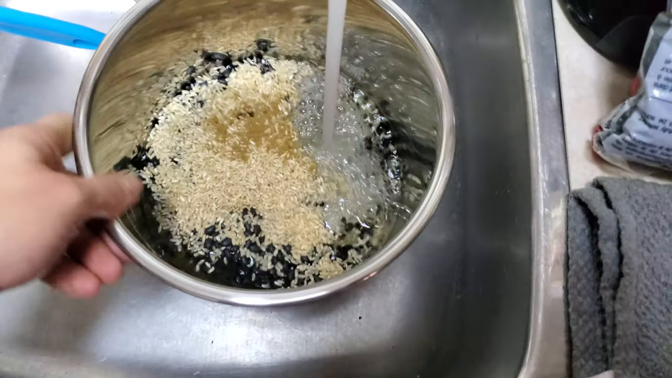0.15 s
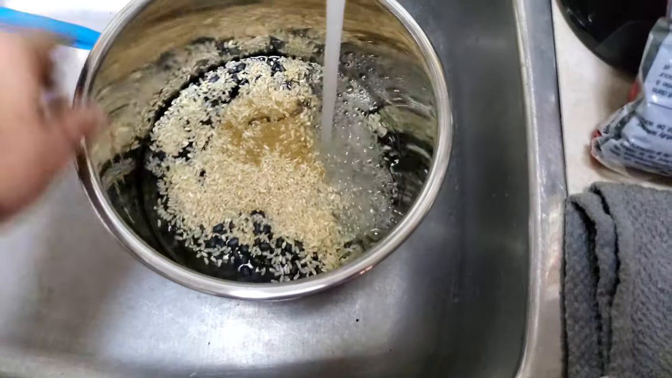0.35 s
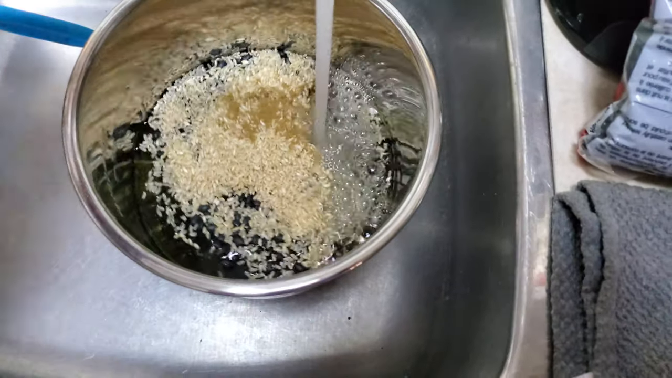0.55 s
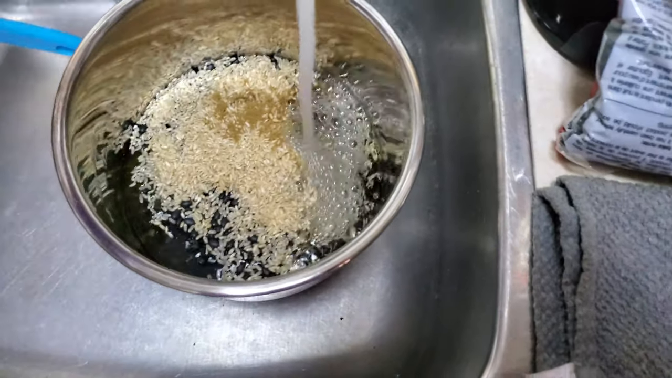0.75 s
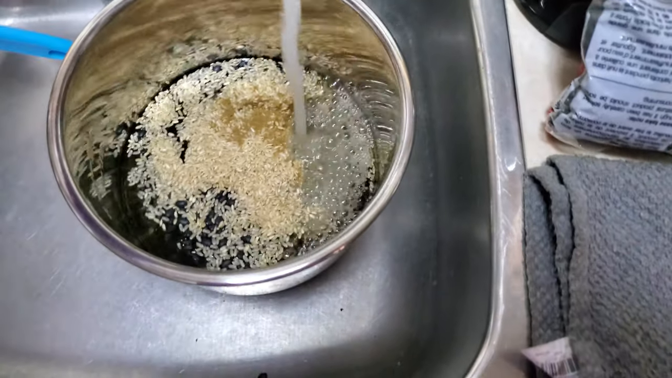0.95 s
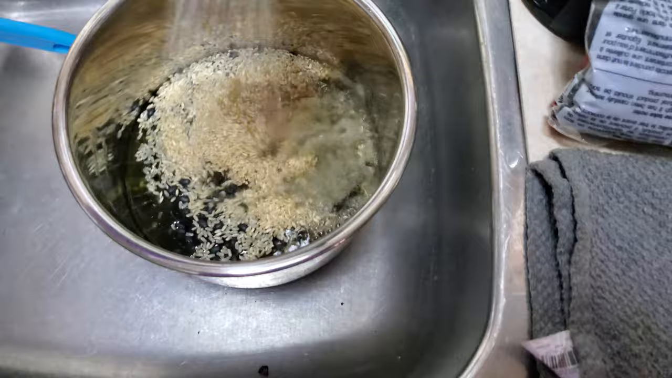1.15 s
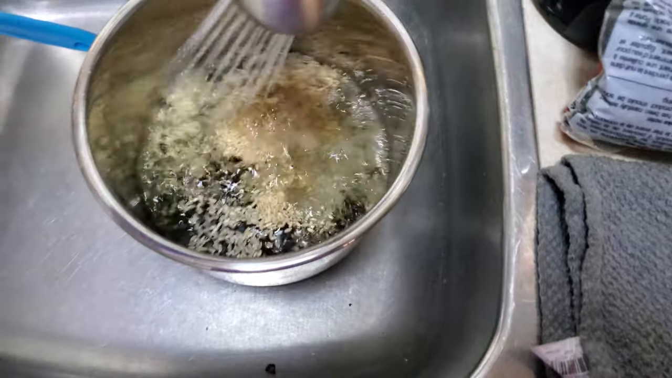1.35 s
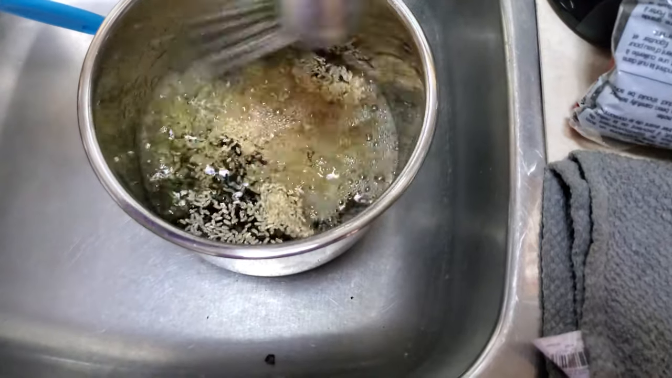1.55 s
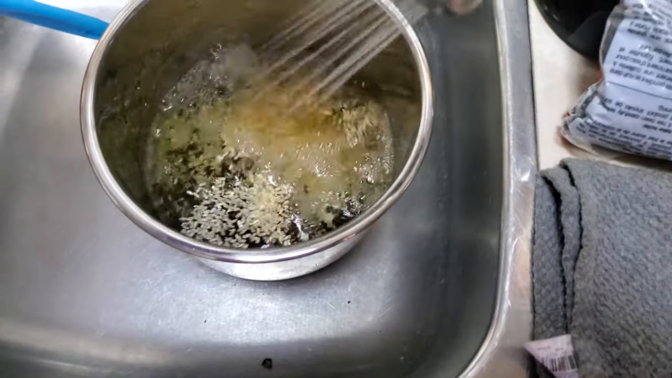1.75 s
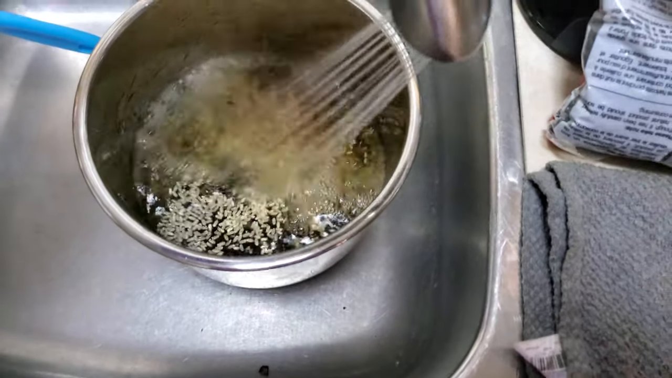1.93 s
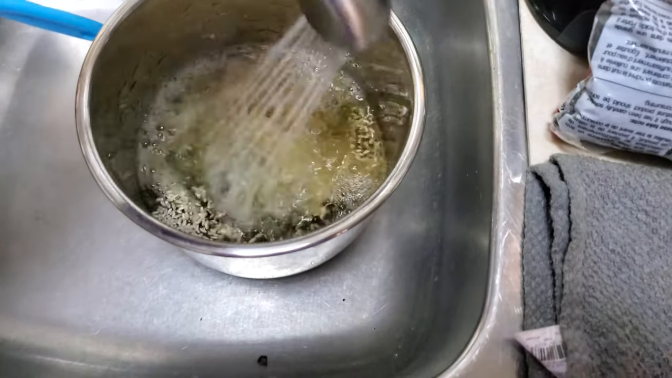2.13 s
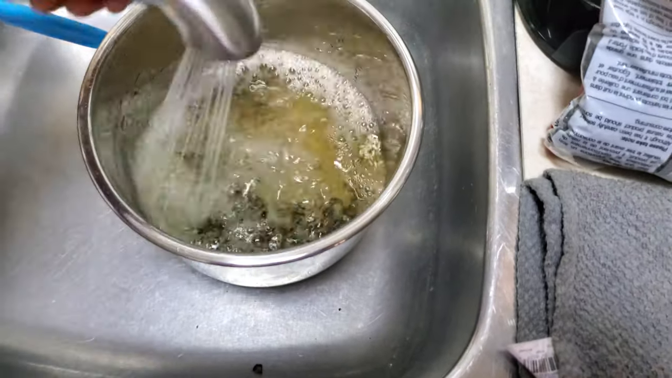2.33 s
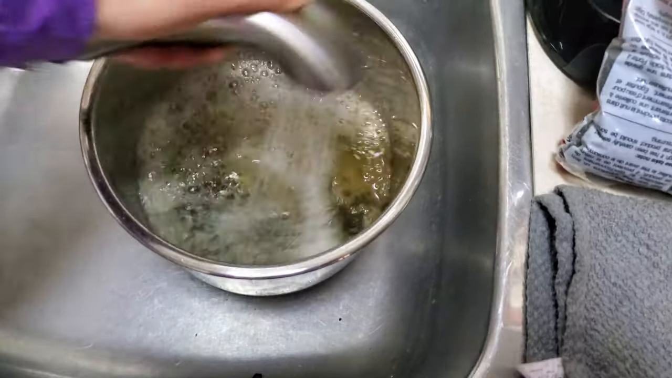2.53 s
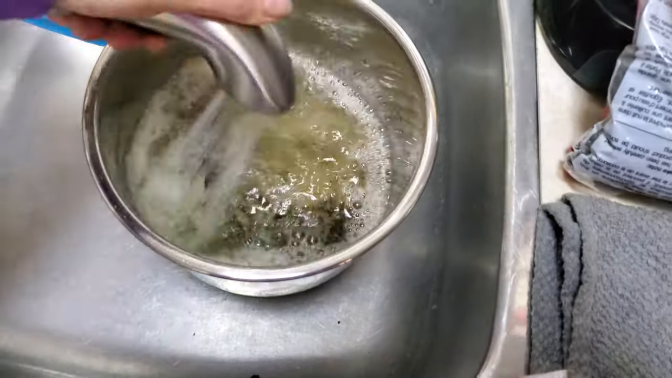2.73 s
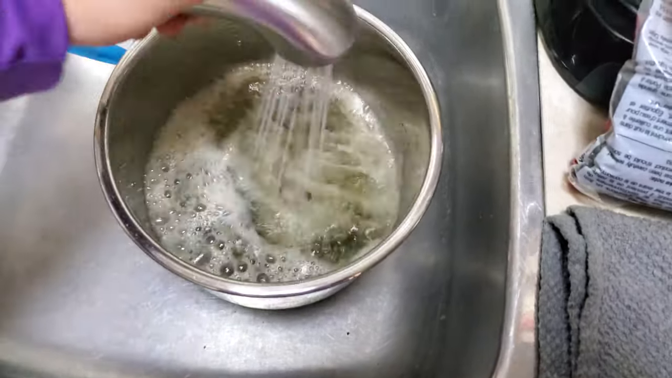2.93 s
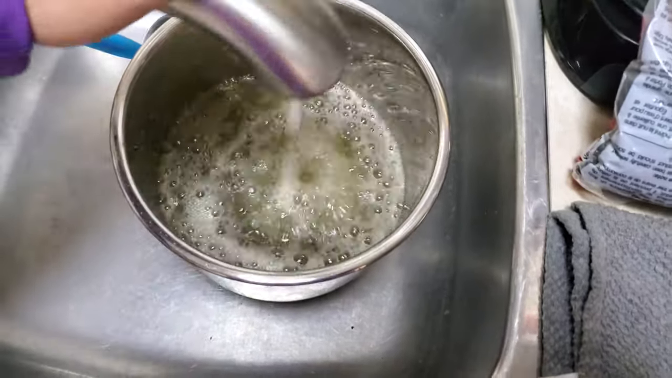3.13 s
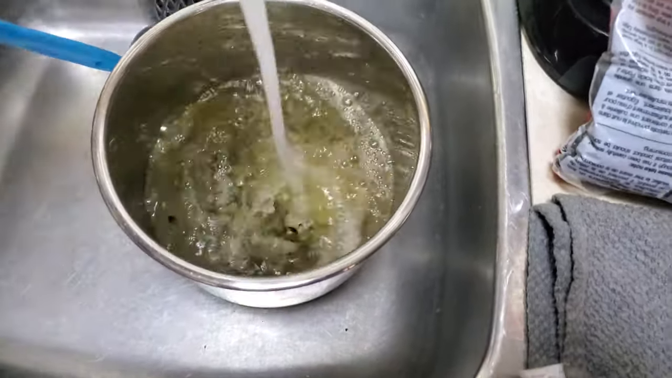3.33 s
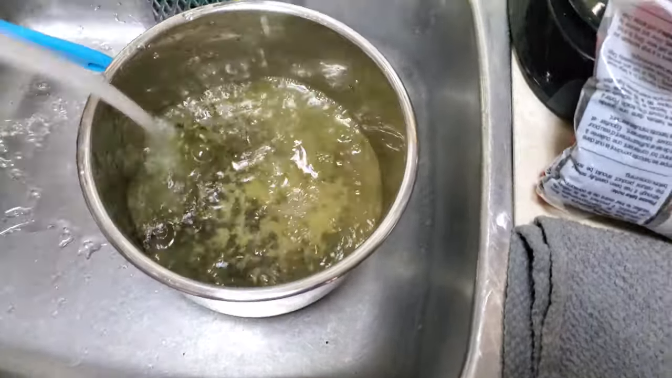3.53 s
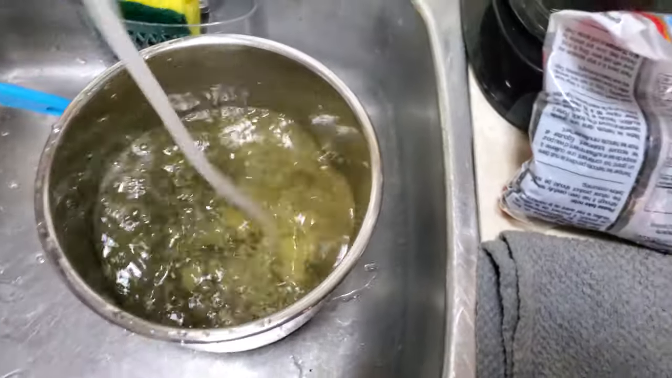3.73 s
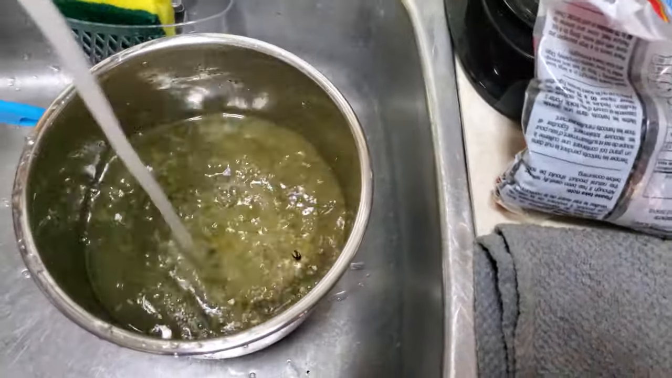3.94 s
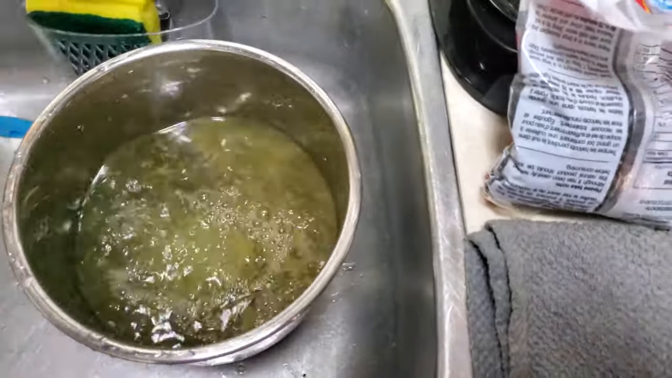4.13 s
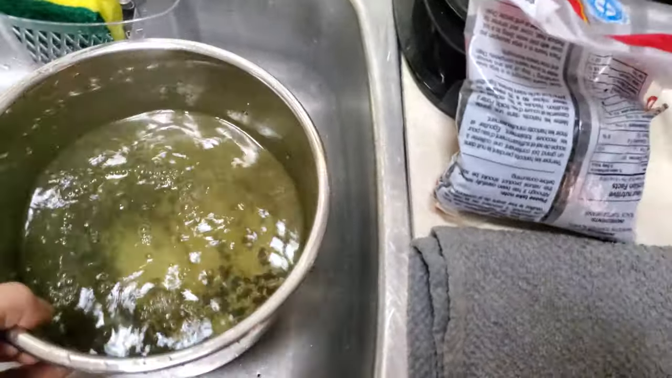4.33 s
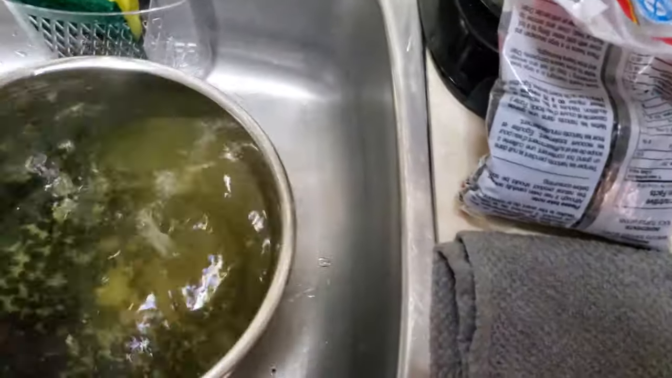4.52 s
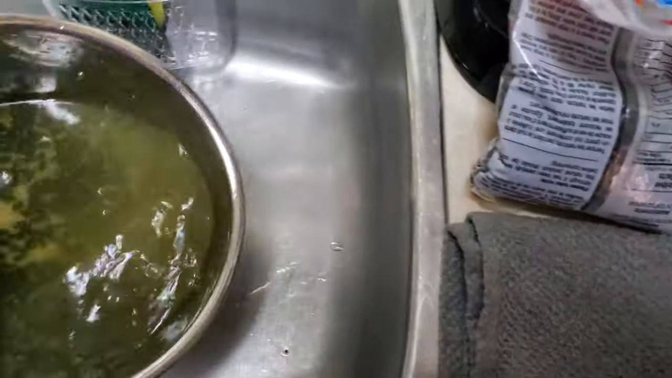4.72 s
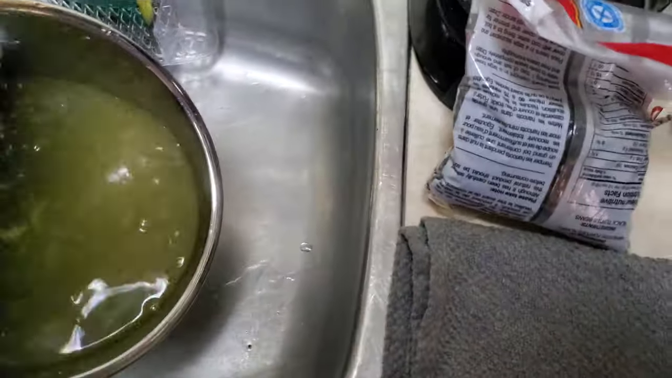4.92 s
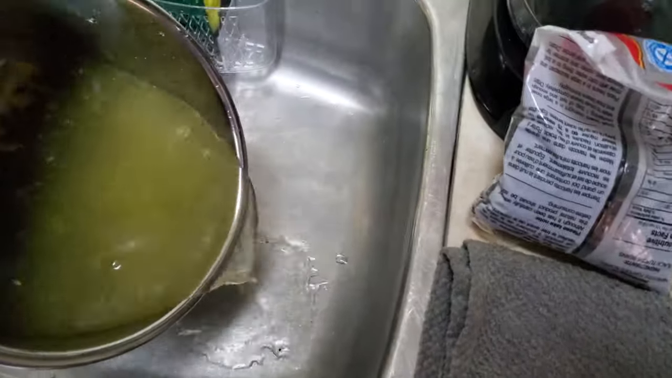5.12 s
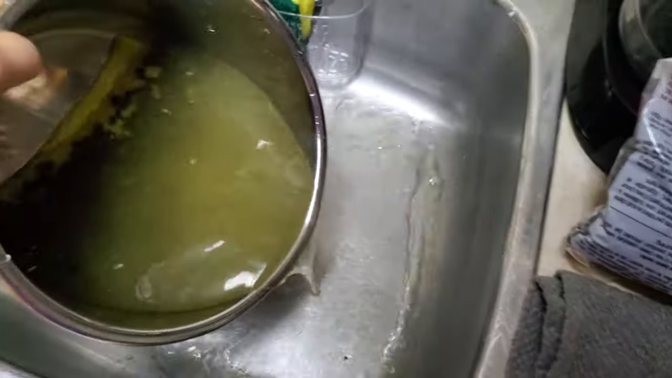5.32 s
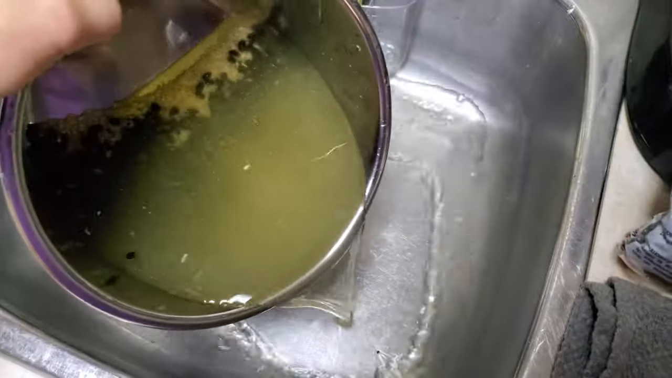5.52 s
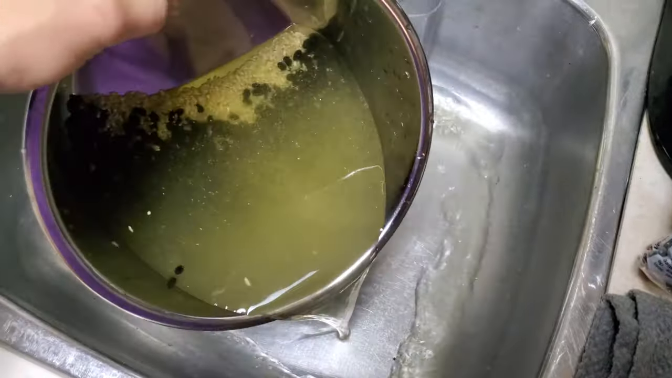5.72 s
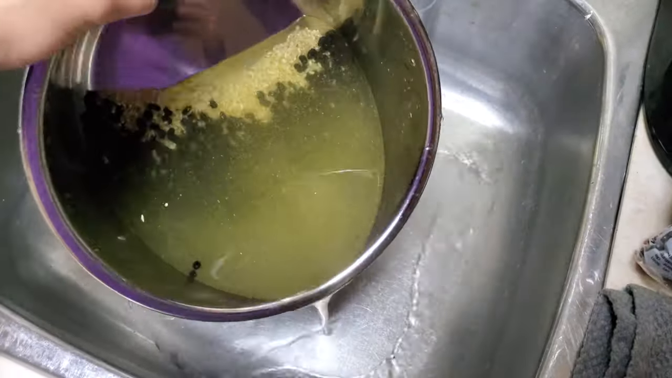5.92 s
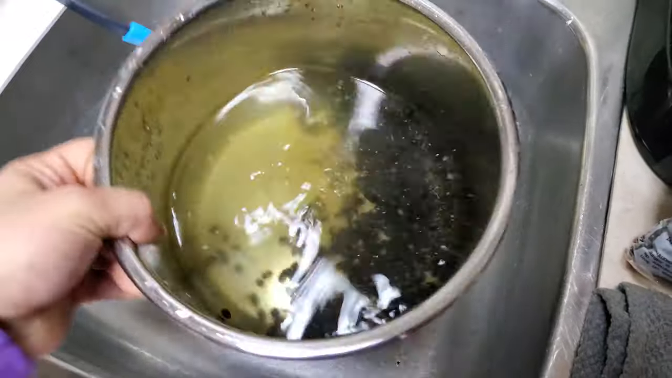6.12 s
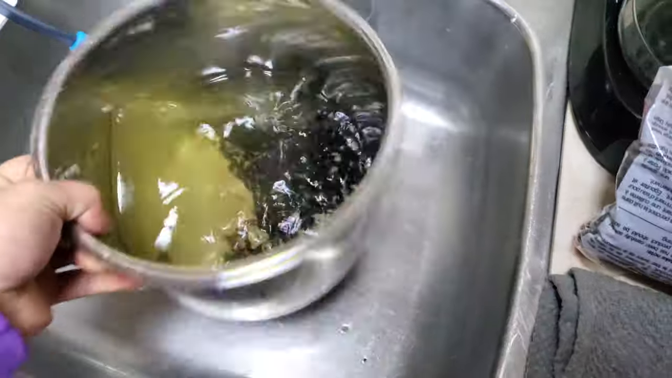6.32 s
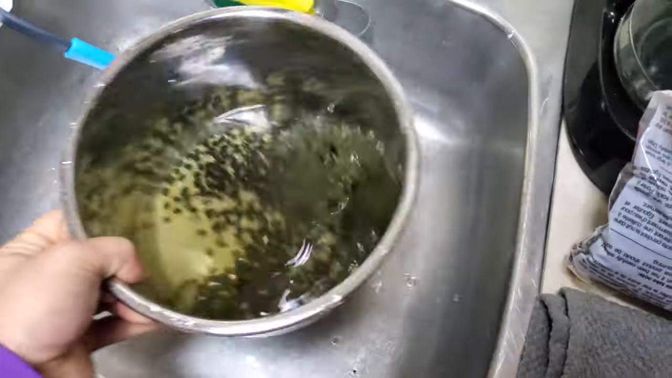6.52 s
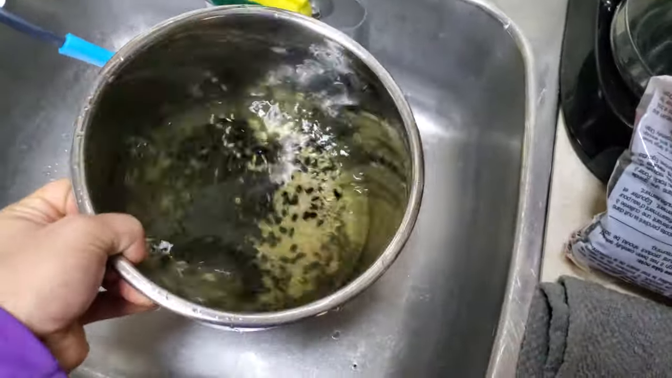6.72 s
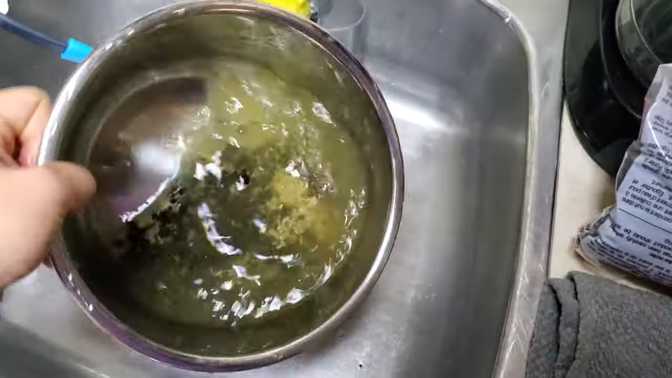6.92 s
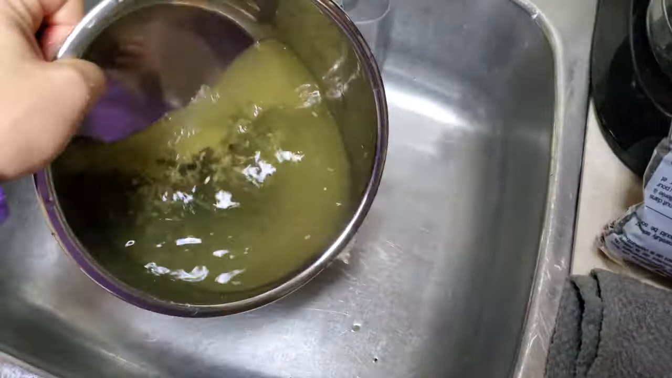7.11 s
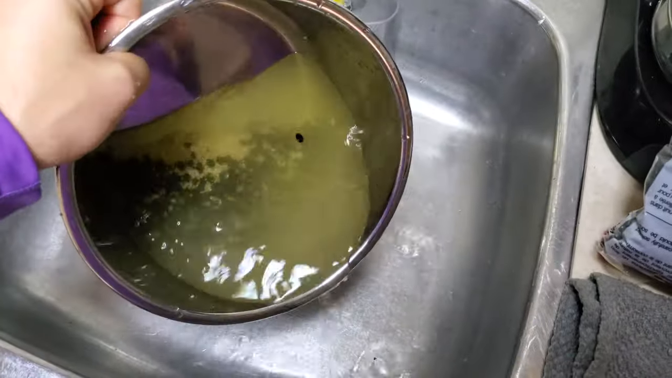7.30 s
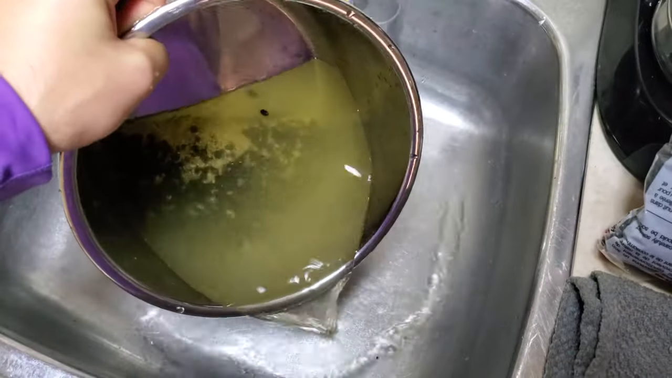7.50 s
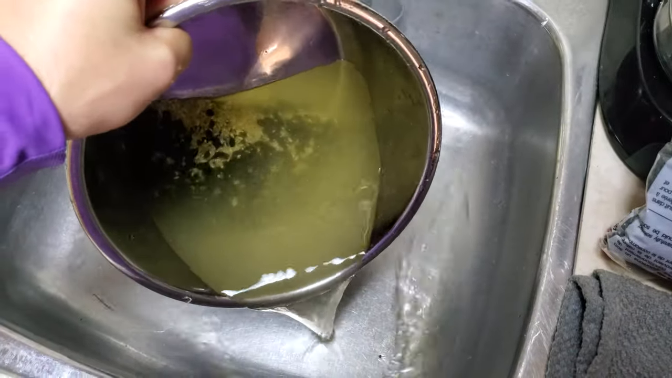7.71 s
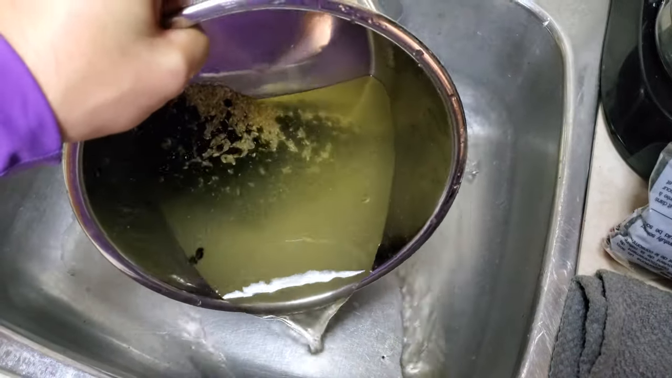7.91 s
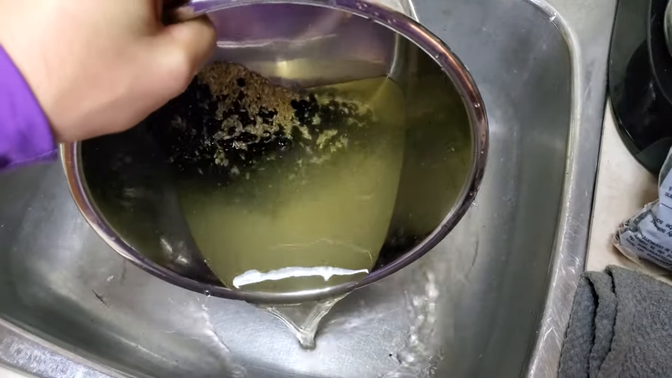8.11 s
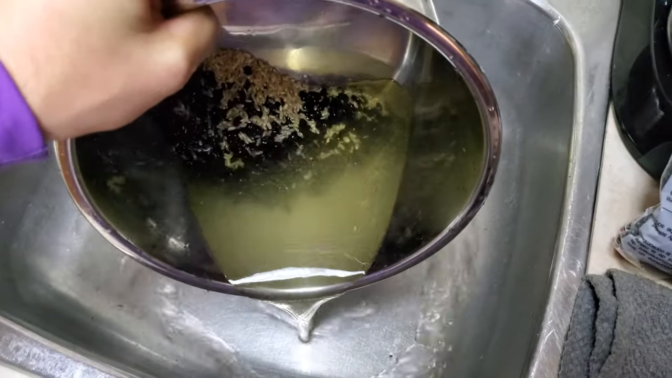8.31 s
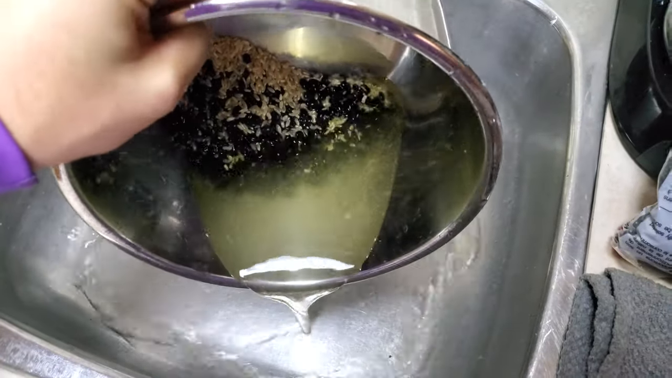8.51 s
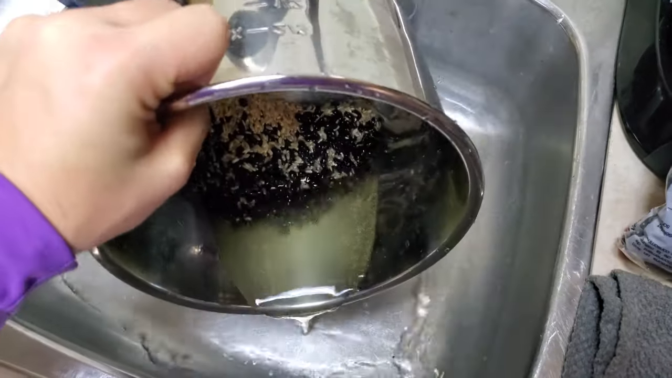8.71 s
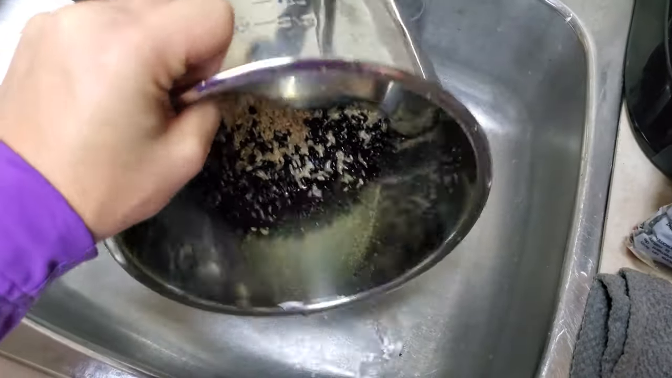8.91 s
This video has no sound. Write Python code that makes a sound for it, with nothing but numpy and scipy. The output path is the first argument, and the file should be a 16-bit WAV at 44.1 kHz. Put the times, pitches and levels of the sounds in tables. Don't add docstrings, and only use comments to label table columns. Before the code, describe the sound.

Close, wide stereo at a metal kitchen sink. From 0 s a strong tap jet hisses into a steel pot, with churning water, hollow pot hum and dull knocks in the first 0.4 s. The jet holds steady until a click and brief choke at about 1.0 s; a fuller, brighter spray then roars over the walls, wavering, with thuds near 1.4 and 2.0 s. At 3.2 s the flow cuts for an instant and returns as a jet in deeper water, with gulping bubbles and knocks. It shuts at 4.2 s, leaving low basin and pipe rumble. From 4.3 to 6 s come light slops, drips and fizzing bubbles. From 6 to 7.1 s swirling brings loud bright splashes, the sharpest near 6.7 s, and ringing bubbly tones. Until 9 s a softer, broken trickle drains with plinks and a bright spit near 8.6 s.

```python
import sys
import numpy as np
from scipy import signal
from scipy.fft import rfft, irfft, next_fast_len
from scipy.io import wavfile
from scipy.ndimage import uniform_filter1d

SR = 44100
rng = np.random.default_rng(int(sys.argv[2]) if len(sys.argv) > 2 else 0)


def unload_wav(signal):
    wavfile.write(
        sys.argv[1],
        SR,
        np.round(np.clip(np.atleast_2d(signal).T, -1, 1) * 32767).astype(np.int16),
    )


def boost(x):
    u = np.asarray(x, float) / 20
    return 10 ** u


N = 394870

# start_s, level_db
STIR = [(0.0, -37), (.33, -24.5), (.45, -36), (1.06, -38), (1.12, -35), (1.47, -32), (1.9, -24.5),
        (2.4, -30.5), (3.14, -25), (3.22, -39), (4.19, -37), (4.28, -67), (5.3, -58.5), (5.65, -56),
        (6.62, -45), (6.8, -28), (7.07, -38), (7.13, -64)]
# start_s, length_s, depth_db
GULPS = [
    (1.33, 0.037, -5),
    (3.27, 0.021, -2),
    (3.585, 0.028, -0.5),
    (3.9, 0.018, -3.5),
]
# start_s, length_s, depth_db
LULLS = [(4.255, 0.072, -4), (4.995, 0.034, -6), (5.09, 0.043, -7), (5.525, 0.047, -6), (5.922, 0.015, -32),
         (7.52, 0.031, -20), (7.797, 0.029, -17), (7.86, 0.065, -9), (8.365, 0.012, -6), (8.51, 0.12, -9),
         (8.69, 0.023, -10)]
# start_s, peak_db, pitch_hz
TIPPING = [(4.9, -38, 2280), (4.94, -38, 2780), (4.4383, -21, 1450), (4.6057, -22.5, 3900),
           (4.629, -24, 2600), (4.614, -32, 1020), (4.782, -31.5, 2060), (4.897, -25, 1547),
           (4.96, -35, 1580), (4.985, -41, 2820), (5.0723, -33, 1810), (5.165, -35, 2245),
           (5.317, -30, 3110), (5.393, -33.5, 2550), (5.4415, -30, 1590), (5.684, -30, 2700),
           (5.7029, -27.5, 2330), (5.7264, -26, 3700)]
SWIRLING = [(6.021, -25, 1685), (6.0582, -17, 1630), (6.1222, -27, 2080), (6.4045, -18.5, 1820),
            (6.429, -21.5, 2450), (6.5398, -19, 2570), (6.673, -32, 2490), (6.869, -23, 1520),
            (7.079, -22, 1430)]
DRAINING = [(7.3791, -24, 4900), (7.4486, -37, 2400), (7.582, -33, 2620), (7.6874, -42, 4840),
            (7.8245, -33, 2760), (7.955, -24, 774), (7.9184, -31, 2000), (7.985, -31, 1424),
            (8.077, -29, 3020), (8.133, -26.5, 1350), (8.153, -23, 1610), (8.2224, -30, 3020),
            (8.264, -26.5, 984), (8.3285, -29, 2150), (8.359, -28, 2950), (8.44, -30.5, 1520),
            (8.6727, -32, 2026), (8.762, -33, 1800), (8.855, -31, 3630), (8.9443, -21, 1610)]
# start_s, peak_db, pitch_hz
DROPS = [(4.333, -34, 4500), (4.334, -30, 7364), (4.419, -41, 6459), (4.437, -32, 4950), (4.569, -32, 6000),
         (4.581, -28, 8613), (4.626, -21, 1670), (4.626, -24, 8040), (4.631, -28, 6890), (4.631, -23, 2680),
         (4.666, -20.5, 3870), (4.679, -21, 5211), (4.68, -20, 6718), (4.859, -34, 8100), (4.96, -37, 3500),
         (4.986, -36, 2250), (5.031, -41, 1550), (5.036, -43, 2799), (5.037, -38, 6589), (5.038, -46, 5900),
         (5.038, -46, 7407), (5.145, -43, 7019), (5.146, -48, 4005), (5.148, -45, 5211), (5.163, -31, 7795),
         (5.163, -35, 2368), (5.218, -31, 4134), (5.228, -33, 6450), (5.245, -37, 3000), (5.315, -25, 8484),
         (5.316, -32, 2030), (5.317, -26.5, 7500), (5.331, -32, 6660), (5.442, -31.5, 1250),
         (5.558, -34, 6340), (5.571, -40, 4800), (5.615, -28, 1450), (5.705, -30, 8570), (5.707, -32, 7665),
         (5.742, -30, 3020), (5.767, -36, 3402), (5.898, -28.5, 3200), (5.908, -37, 1360),
         (5.907, -25, 6200), (5.91, -36, 8570), (5.94, -43, 1990), (5.958, -29, 1880), (6.021, -32, 1774),
         (6.162, -27, 3460), (6.229, -40, 1894), (6.233, -23, 3040), (6.521, -35, 8527), (6.523, -25, 6761),
         (6.537, -27, 4608), (6.584, -36, 1937), (6.598, -18.5, 3860), (6.695, -14, 3470),
         (6.784, -19, 2360)]
LATE_DROPS = [(6.828, -17, 4540), (6.93, -22, 2510), (6.969, -20, 880), (7.074, -24, 4460),
              (7.266, -34, 5540), (7.267, -31, 8000), (7.314, -34, 6500), (7.355, -49, 6330),
              (7.364, -48, 1960), (7.369, -27, 5100), (7.379, -23, 6000), (7.38, -31, 4130),
              (7.45, -30, 8742), (7.508, -39, 2411), (7.602, -53, 2842), (7.615, -40, 5040),
              (7.642, -41, 2640), (7.655, -28, 5830), (7.686, -41, 4521), (7.714, -27, 5280),
              (7.754, -33, 8441), (7.78, -38, 3120), (7.788, -24.5, 6300), (7.83, -46, 2110),
              (7.834, -47, 8139), (7.886, -35, 3600), (7.929, -34, 2770), (7.934, -40, 3800),
              (7.956, -40, 4392), (7.966, -20.5, 1410), (8.0, -36, 2700), (8.027, -36, 7149),
              (8.076, -23, 2740), (8.094, -31, 1580), (8.193, -24, 8053), (8.195, -24, 2020),
              (8.22, -38, 3150), (8.259, -31, 4651), (8.294, -29, 1990), (8.328, -35, 2200),
              (8.359, -42, 2960), (8.438, -38, 1540), (8.456, -40, 7300), (8.457, -29, 7740),
              (8.47, -33, 3000), (8.533, -32.5, 7019), (8.577, -38, 6976), (8.596, -29, 8500),
              (8.637, -34, 4952), (8.67, -37, 7850), (8.672, -34, 2066), (8.673, -36, 6675),
              (8.763, -35, 1530), (8.785, -33, 8484), (8.803, -32, 1770), (8.81, -36, 3970),
              (8.904, -39, 4950), (8.948, -30, 1600)]


def rms_one(x):
    return x / np.sqrt(np.mean(x ** 2) + 1e-20)


def in_time(rows):
    s, *columns = np.transpose(rows)
    return [np.interp(np.arange(N) / SR, s, c, left=-120) for c in columns]


def at_hz(points, hz, column=1):
    points = np.array(points)
    return np.interp(np.log(hz), np.log(points[:, 0]), points[:, column])


def drift(rate_hz):
    r = np.exp(-80 * np.pi * rate_hz / SR)
    noise = rng.standard_normal(N // 40 + 2002)
    slow = signal.lfilter([1], [1, -2 * r, r * r], noise)[2000:]
    return np.interp(np.arange(N) / 40, np.arange(len(slow)), rms_one(slow))


def ports(near, other, hz):
    # pitch_hz, share in step, share a quarter cycle apart
    likeness = [(30, 0.47, 0.23), (127, 0.53, 0.53), (250, 0.24, 0.24), (500, 0.39, 0.61),
                (1190, 0.024, 0.3), (3020, 0.017, 0.078), (8050, 0, 0.072)]
    step, turned = at_hz(likeness, hz), at_hz(likeness, hz, column=2)
    quarter = np.gradient(near) / np.sin(2 * np.pi * hz / SR)
    own = np.sqrt(max(1 - step ** 2 - turned ** 2, 0))
    return np.array([near, step * near - turned * quarter + own * other])


def grains(per_s, spread_db):
    lumps = np.ones((2, 1, N))
    at = rng.random((2, 1, N)) < per_s / SR
    lumps[at] += boost(spread_db * np.minimum(rng.exponential(1, at.sum()), 4))
    return rng.standard_normal((2, 2, N)) * lumps


def bands(source, spectrum, edges, patchy_db, rate_hz, shared):
    out, together, k = [], drift(rate_hz), 0
    for low, high in zip(edges, edges[1:]):
        cuts = np.geomspace(low, high, 2 + int(2.3 * np.log2(high / low)))
        layer = 0
        for pair in zip(cuts, cuts[1:]):
            k += 1
            band = signal.butter(2, pair, "band", fs=SR, output="sos")
            near, other = signal.sosfilt(band, source[k % 2])
            hz = np.sqrt(pair[0] * pair[1])
            flicker = shared * together + drift(rate_hz * 2.2)
            gain = boost(at_hz(spectrum, hz) + patchy_db * flicker)
            layer = layer + gain * ports(near, other, hz)
        out.append(layer / np.sqrt(np.mean(layer.mean(axis=0) ** 2)))
    return out


def modes(source, table, patchy_db, lead_db=0):
    out, power = 0, 0
    for k, (hz, width_hz, level_db) in enumerate(table):
        r = np.exp(-1.5 * np.pi * width_hz / SR)
        sos = [[1, 0.001, -1.014, 1, -2 * r * np.cos(2 * np.pi * hz / SR), r * r]] * 2
        gain = boost(level_db + lead_db * (k == 0))
        ringing = rms_one(signal.sosfilt(sos, source[k % 2]))
        out = out + gain * boost(patchy_db * drift(16.0)) * ports(*ringing, hz)
        power = power + gain ** 2
    return out / np.sqrt(power)


def ringers(table, rise_s, fall_s, glide, offset_db, friend_db, spread=6.7, tail=2):
    out, chance = np.zeros((2, N)), rng.random((len(table), 5))
    t = np.arange(int(4 * fall_s * SR)) / SR
    envelope = (1 - np.exp(-(t / rise_s) ** 2)) * np.exp(-(t / fall_s) ** tail)
    for (s, peak_db, hz), (turn, place, bend, size, beat) in zip(table, chance):
        port_phase = np.array([[0], [spread * (turn - .5) - 1.1]])
        phase = 2 * np.pi * hz * t * (1 + glide * bend * t) + port_phase
        tone = np.sin(phase) + boost(friend_db) * np.sin(phase * (1.25 + 0.612 * size))
        tone = tone + 0.3 * np.sin(phase + 2 * np.pi * (60 + 120 * beat) * t)
        pan = boost([[6 * (place - .5)], [6 * (.5 - place)]])
        i = round(s * SR - rise_s * SR / 2)
        out[:, i:i + len(t)] += (boost(peak_db + offset_db) * envelope * tone * pan)[:, :N - i]
    return out


def chokes(table):
    choke_db = np.zeros(N)
    for s, length_s, depth_db in table:
        choke_db[round(s * SR):round((s + length_s) * SR)] = depth_db
    return boost(uniform_filter1d(choke_db, size=150))


def surges():
    # centre_s, length_s, level_db, extra_on_bottom_db
    swells = [(.01, 0.074, -26, 5), (0.132, 0.12, -24, -18), (0.243, 0.061, -26.5, 5),
              (1.193, 0.21, -30.5, -15), (1.403, 0.068, -32.5, 0), (2.032, 0.19, -31.5, 0),
              (2.24, 0.071, -36.5, 10.5), (3.418, 0.021, -22, -10), (3.557, 0.021, -25, -2),
              (3.76, 0.13, -28.5, -3), (3.84, 0.046, -41.5, 14), (4.42, 0.053, -33, -1),
              (5.725, 0.13, -43.5, 8.5), (6.398, 0.047, -34, 6.5), (6.494, 0.062, -45, 17),
              (7.014, 0.15, -43.5, 13.5), (7.626, 0.02, -39.5, 1.5), (7.757, 0.054, -41, -4.5),
              (7.839, 0.011, -49, 23), (1.034, 0.021, -29, 0.5), (5.511, 0.045, -43.5, 4),
              (5.622, 0.035, -34.5, -4.5), (6.084, 0.19, -42.5, 11.5), (7.958, 0.11, -44, 10),
              (8.423, 1, -47, 9.5)]
    t, power = np.arange(0, N, 40) / SR, 0
    for s, length_s, level_db, bottom_db in swells:
        peak = boost(2 * np.array([[level_db], [level_db + bottom_db]]))
        power = power + peak * np.exp(-(2 * (t - s) / length_s) ** 2)
    return [np.interp(np.arange(N) / SR, t, p) for p in power]


def flow():
    # start_s, level_db
    running = [(4.2, -50.5), (4.41, -45), (5.01, -52), (5.19, -57), (5.61, -46.5), (6.13, -38), (6.38, -45),
               (6.53, -38.5), (6.85, -30.5), (6.95, -32.5), (7.1, -39.5), (7.22, -50), (7.6, -56.5),
               (8.17, -40.5), (8.51, -51), (8.95, -56.5)]
    trickle_db, = in_time(running)
    return trickle_db, trickle_db - 4 + 0.077 * (trickle_db + 28)


def tap():
    # start_s, nozzle_hiss_db, churned_water_db
    nozzle = [
        (0.0, -23.5, -31),
        (0.3, -25, -35),
        (1.05, -22.5, -32.5),
        (1.135, -24.5, -30.5),
        (1.37, -25, -29.5),
        (3.19, -24.5, -33.5),
        (4.15, -35.5, -40.5),
        (4.22, -73, -61),
    ]
    # start_s, length_s, depth_db
    switches = [
        (1.029, 0.035, -11),
        (3.167, 0.025, -56),
    ]
    # pitch_hz, level_db per Hz
    hiss_colour = [(1000, -2), (1350, -6.5), (2200, -0.5), (6000, -3), (10000, -3.5), (16500, -3.5)]
    # left_delay_s, right_delay_s, share
    wall_echoes = [(.00176, .00177, .3), (.00048, .00048, .24)]
    settle_s, churn_follows, surge_splash_db = 0.026, 0.15, -7.5
    time_s = np.arange(N) / SR
    nozzle = np.array(nozzle)
    setting = np.searchsorted(nozzle[1:, 0], time_s)
    hiss_db, churn_db = uniform_filter1d(nozzle[setting, 1:].T, round(settle_s * SR))
    churn_db = churn_db + churn_follows * (in_time(STIR)[0] + 33)
    splash = surges()[0] * boost(2 * surge_splash_db)
    churn, hiss = bands(grains(600, 4.7), hiss_colour, [1200, 4500, 17200],
                        patchy_db=1.5, rate_hz=9.9, shared=0.58)
    churned = np.sqrt(boost(2 * churn_db) + splash) * churn * chokes(GULPS)
    water = chokes(switches) * (boost(hiss_db) * hiss + churned)
    bare = np.interp(time_s, [.3, .4, 1.04, 1.1], [.5, 1, 1, .25])
    echoes = [sum(row[2] * np.roll(water[c], round(row[c] * SR)) for row in wall_echoes) for c in (0, 1)]
    aside_db = np.interp(time_s, [3.4, 3.6], [0, 1.2])
    return (water + bare * np.array(echoes)) * boost([aside_db, -aside_db])


def pot():
    # pitch_hz, width_hz, level_db
    belly_modes = [(362, 64, -11), (495, 75, -1), (555, 69, -3), (614, 162, -3)]
    rim_modes = [(838, 55, 0), (1075, 100, -1), (1460, 40, -8)]
    bottom_modes = [(165.3, 48, 1.5), (245, 86, 3.5), (286.3, 52.5, 2)]
    # start_s, lead_db
    aim = [
        (0, 1),
        (.45, 12),
        (1.27, 8.5),
        (1.33, -14),
        (1.6, -5),
        (2.0, 2),
        (2.35, -13),
        (2.9, -15),
        (3.1, 6),
    ]
    # start_s, lead_db
    swirl = [
        (0, -9),
        (6.2, -5),
        (6.35, 9),
        (6.74, -10),
        (6.83, -7),
        (7.05, 18),
        (7.08, 5),
    ]
    (stir_db,), (rim_lead_db,), (walls, bottom) = in_time(STIR), in_time(swirl), surges()
    rim = boost(2 * np.minimum(stir_db - 6, -33)) + walls * boost(2 * -9)
    bottom = bottom + boost(2 * (-39.5 + 0.3 * (stir_db + 31)))
    bottom = bottom + boost(2 * (-48 + flow()[0] + 33))
    water = grains(110, 2.3)
    belly_ring = modes(water, belly_modes, patchy_db=4.5, lead_db=in_time(aim)[0])
    rim_ring = modes(water, rim_modes, patchy_db=2.5, lead_db=rim_lead_db)
    bottom_ring = modes(water, bottom_modes, patchy_db=5.0)
    return (np.sqrt(boost(2 * stir_db) + walls) * boost(-1.03) * belly_ring
            + np.sqrt(rim) * boost(0.29 * np.maximum(rim_lead_db, 0)) * rim_ring
            + np.sqrt(bottom) * boost(-2.0) * bottom_ring)


def rumble():
    # start_s, level_db
    boom_level = [
        (0.0, -33),
        (0.69, -33),
        (3.61, -37),
        (4.19, -32.5),
        (4.24, -35),
        (6.03, -31.5),
        (8.65, -34.5),
        (8.95, -31.5),
    ]
    # pitch_hz, level_db per Hz
    deep = [(12, -47), (20, -17.5), (103, -2.5), (226, -23), (258, -9), (291, -25.5), (398, -40.5),
            (483, -69), (700, -71), (910, -82), (1540, -120)]
    # pitch_hz, width_hz, level_db
    booms = [(58.7, 5.5, -3.5), (98.5, 36, 0.5)]
    level_db, = in_time(boom_level)
    white = rng.standard_normal((2, 2, N))
    floor = bands(white, deep, [20, 800], patchy_db=0.0, rate_hz=12.0, shared=0.87)[0]
    return boost(level_db - 1.5) * (floor + boost(-4.5) * modes(white[::-1], booms, patchy_db=1.5))


def knocks():
    # start_s, peak_db, pitch_hz
    thuds = [(0.004, -16.5, 300), (0.232, -13, 300), (0.323, -12, 315), (1.1, -18, 92.4), (1.359, -17, 195),
             (2.038, -15, 262), (3.153, -18.5, 104.4), (3.801, -17, 240), (3.997, -17, 61.9),
             (4.145, -13.5, 107.6), (4.855, -32, 108), (6.453, -14, 201), (6.842, -16.5, 230),
             (6.979, -28, 245), (7.056, -19, 245), (7.564, -24, 85)]
    return ringers(thuds, rise_s=0.0022, fall_s=0.023, glide=0.32, offset_db=-0.5, friend_db=-34.0, spread=1.5)


def hums():
    # start_s, length_s, level_db, pitch_hz
    strokes = [(.05, 0.058, -22, 500), (.116, 0.059, -16, 500), (1.14, 0.063, -24.5, 505),
               (1.2, 0.066, -29.5, 540), (3.4, 0.031, -33, 526), (3.425, 0.017, -20.5, 370),
               (3.7, 0.11, -24.5, 530), (6.41, .03, -33, 800), (6.445, 0.064, -35, 852),
               (6.81, 0.23, -27.5, 841), (6.82, 0.25, -38.5, 1455), (6.925, 0.096, -22, 245),
               (7.885, 0.051, -39, 518), (8.015, 0.026, -30.5, 540)]
    out, waver, swell = np.zeros((2, N)), drift(69), drift(42)
    for s, length_s, level_db, hz in strokes:
        i, n = round(s * SR), round(length_s * SR)
        part = np.arange(n) / n
        wavering_hz = hz * (1 + 0.041 * waver[i:i + n])
        phase = 2 * np.pi * np.cumsum(wavering_hz) / SR + np.array([[1.3], [0]])
        attack = np.minimum(np.arange(n) / SR / 0.0076, 1)
        release = np.sqrt(np.minimum((1 - part) / 0.23, 1))
        out[:, i:i + n] += boost(level_db + 4 * swell[i:i + n]) * attack * release * np.sin(phase)
    return out


def clicks():
    # start_s, peak_db, pitch_hz
    ticks = [(1.003, -35, 506), (1.02, -25, 795), (1.021, -24, 1546), (1.023, -30, 2770), (3.163, -24, 413),
             (3.536, -44, 705), (3.57, -23.5, 1770), (3.637, -31, 1050), (3.74, -28, 1490),
             (4.003, -31, 1270), (7.085, -19.5, 990)]
    return ringers(ticks, rise_s=0.0011, fall_s=0.0083, glide=19.0, offset_db=4.5, friend_db=-4.5, spread=5.6)


def bubbles():
    # start_s, peak_db, pitch_hz
    gulped_air = [(3.191, -19, 530), (3.376, -31, 1055), (3.4, -27, 565), (3.542, -41, 495),
                  (3.662, -24, 560), (3.726, -27, 430), (3.776, -16, 495), (3.887, -21, 545),
                  (3.963, -24, 670), (4.007, -17.5, 426), (4.192, -25, 550), (4.34, -30.5, 527),
                  (5.499, -23.5, 720), (5.606, -26, 760), (6.705, -23.5, 640), (6.729, -20, 470),
                  (6.833, -17, 493), (6.862, -17.5, 820), (6.92, -15, 873), (6.97, -13.5, 805),
                  (7.01, -20.5, 885), (7.038, -25, 813), (7.072, -22, 522), (7.722, -20.5, 500),
                  (7.83, -18.5, 797), (7.881, -25.5, 487), (7.917, -28, 464)]
    return ringers(gulped_air, rise_s=0.00457, fall_s=0.012, glide=0.93, offset_db=5.0, friend_db=-9.5)


def pouring(drops_and_fizz):
    # start_s, peak_db, centre in octaves above 1 kHz
    slaps = [(4.432, -25.5, 3.2), (4.5709, -29, 2.9), (5.1471, -34, 4.8), (5.3027, -27.5, 5.6),
             (5.615, -30.5, 3), (5.936, -26.5, 3.3), (6.057, -42, 1.3), (6.1703, -37, 2.7),
             (6.3783, -27, 2.5), (6.4386, -27, 2.7), (6.4691, -31, 2.3), (6.6636, -16, 6.5),
             (6.8303, -41, 2.5), (7.074, -28.5, 2.2), (7.613, -39.5, 3.4), (7.6534, -34, 3.1),
             (8.1943, -25, 1.9), (8.4601, -36.5, 4.2), (8.6731, -34, 4.4), (8.765, -37.5, 2.1)]
    # start_s, peak_db, centre in octaves above 1 kHz
    spits = [(4.1887, -28, 2.6), (4.333, -34.5, 2.7), (4.4976, -25.5, 2.27), (4.627, -25, 0.86),
             (4.676, -29, 3.25), (5.2588, -30, 3.06), (5.4494, -31, 2.7), (5.4973, -26.5, 3.07),
             (5.9104, -36, 3.7), (6.2197, -38, 1.45), (6.2491, -30, 2.7), (6.304, -17.5, 2.33),
             (6.365, -18, 2.26), (6.5215, -20, 2.24), (6.5923, -21, 2.9), (6.75, -11.5, 2.28),
             (6.8951, -21, 2.6), (7.264, -36.5, 3.7), (7.371, -30.5, 3.5), (7.7058, -34, 3.1),
             (7.7881, -34, 3.3), (7.829, -42, 3.7), (8.1118, -29, 3.6), (8.1572, -28, 3.8),
             (8.5778, -16.5, 4.64), (8.905, -40.5, 2.7)]
    # pitch_hz, level_db per Hz
    spatter = [(1200, -9.5), (1800, -4.5), (3500, -1.5), (6000, 8), (10000, -0.5), (16500, -6)]
    trickle_db, slosh_db = flow()
    bed_db = np.array([slosh_db - 21, slosh_db + 2.0, trickle_db, trickle_db - 1.5])
    power = boost(2 * bed_db) * chokes(LULLS) ** np.array([[3.0], [2.6], [1.7], [1.7]])
    octaves = np.array([[.3], [1.5], [2.7], [3.6]])
    lowest_db = -2.5 * (octaves < 1)
    falling = [*TIPPING, *SWIRLING, *DRAINING, *drops_and_fizz]
    drips = [(s, db - 11.5, np.log2(hz / 1000)) for s, db, hz in falling]
    for table, fall_db_per_octave in ((slaps, 3.5), ([*spits, *drips], 19)):
        for s, peak_db, centre in table:
            length_s = max(0.044 + 0.00078 * peak_db, .006)
            t = np.arange(SR // 10) / SR / length_s
            shape = (1 - np.exp(-t / .27)) ** 2 * np.exp(-(t / .76) ** 2)
            band_db = peak_db - fall_db_per_octave * abs(octaves - centre) + lowest_db
            i = round((s - .006) * SR)
            power[:, i:i + len(t)] += boost(2 * band_db) * shape[:N - i]
    layers = bands(grains(450, 4.8), spatter, [750, 1900, 4500, 9000, 17200],
                   patchy_db=3.3, rate_hz=30, shared=.75)
    return (np.sqrt(power)[:, None] * np.array(layers)).sum(axis=0)


def fizz(count=420):
    when, size, pitch, near = rng.random((count, 4)).T
    s = 4.33 + np.round(4.5 * when * 25) / 25 + .02 * near
    slosh_db = flow()[1][(s * SR).astype(int)]
    return np.transpose([s, slosh_db + 14 * size ** 2, 1500 * 5 ** pitch ** 1.8])


def pops(fizzing):
    ring = ringers(fizzing, rise_s=.003, fall_s=.008, glide=6, offset_db=3, friend_db=-5)
    return ring * chokes(LULLS)


def single_drops():
    return ringers([*DROPS, *LATE_DROPS], rise_s=.004, fall_s=.009, glide=2.5, offset_db=1,
                   friend_db=-10, spread=2, tail=1.6)


def plinks():
    return ringers([*TIPPING, *SWIRLING, *DRAINING], rise_s=.005, fall_s=.012, glide=2, offset_db=0,
                   friend_db=-12, spread=2, tail=1.5)


def wobble(x, spread_s):
    at = np.arange(N) + spread_s * SR * drift(250)
    return np.array([np.interp(at, np.arange(N), side) for side in x])


def scene():
    fizzing = fizz()
    filling = tap() + pot() * chokes(GULPS) + rumble() + knocks() + hums()
    spray = pouring([*fizzing, *DROPS, *LATE_DROPS])
    small_tones = clicks() + bubbles() + pops(fizzing) + single_drops() + plinks()
    return filling + spray + wobble(small_tones, spread_s=.00005)


def band_limit(x):
    return signal.sosfilt(signal.butter(12, 15830, fs=SR, output="sos"), x)


def record(dry):
    # pitch_hz, level_db
    left_port = [(60, 2.5), (700, 2.5), (2200, 2.5), (5300, -1.1), (6900, -0.5), (7500, -7.5),
                 (10500, -3.5), (13000, 0.5), (15500, 4)]
    right_port = [(60, 2.5), (900, -1.5), (2200, -2), (3300, 2.3), (5300, 2), (5900, -0.5), (7000, 2),
                  (9500, 0.5), (10500, -6), (11800, 3.5), (15000, -4)]
    size = next_fast_len(N)
    hz = np.maximum(np.arange(size // 2 + 1) * SR / size, 1)
    colour = boost([at_hz(left_port, hz), at_hz(right_port, hz)])
    heard = irfft(rfft(dry, size) * colour, size)[:, :N]
    return band_limit(0.78 * np.tanh(heard / 0.83))


dry = scene()
out = record(dry)
unload_wav(out)
```